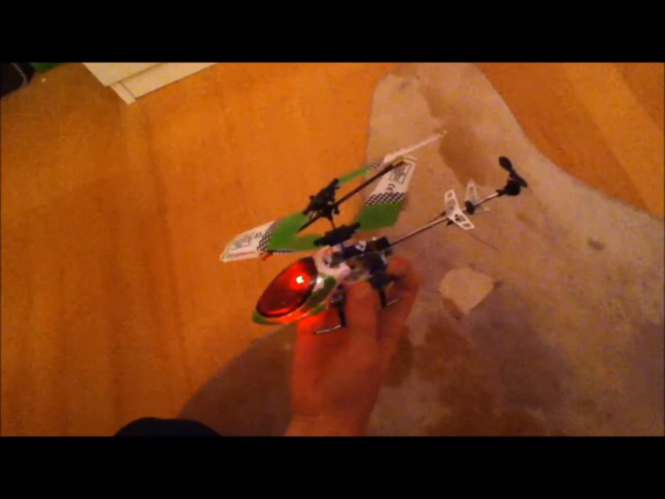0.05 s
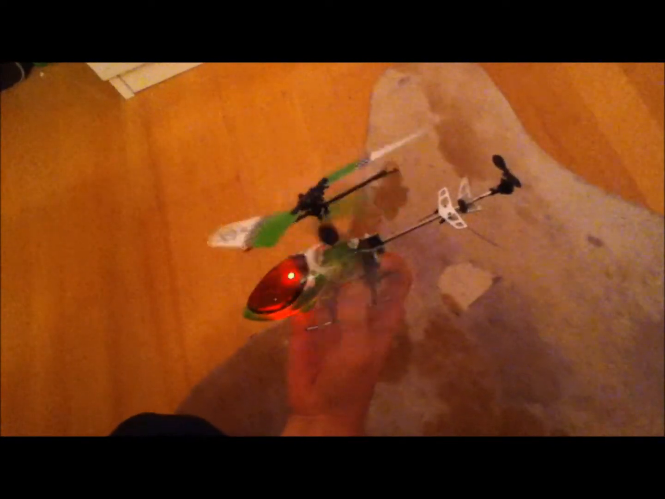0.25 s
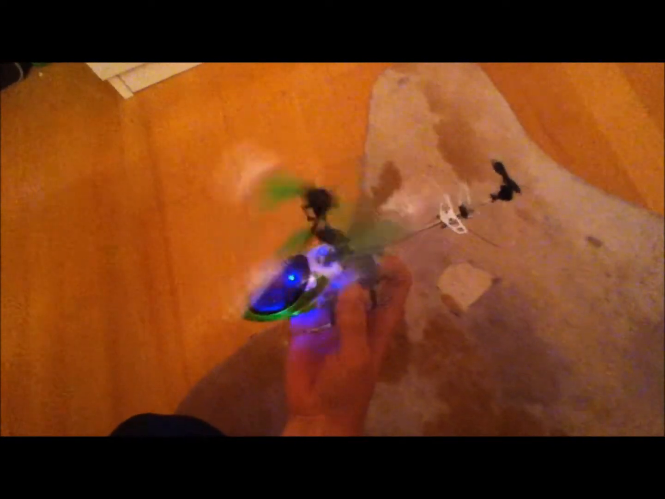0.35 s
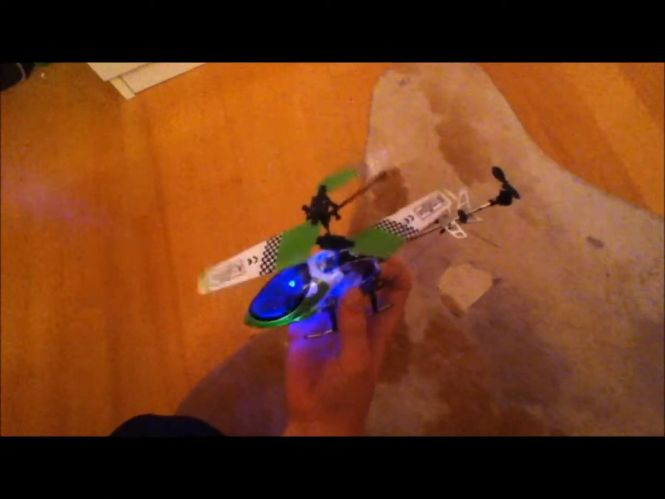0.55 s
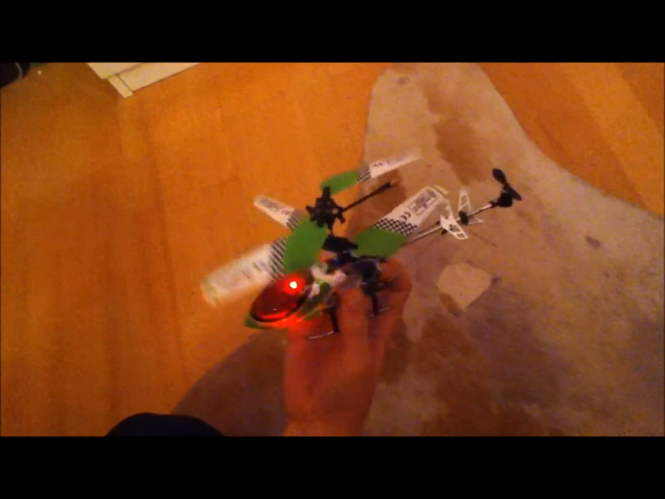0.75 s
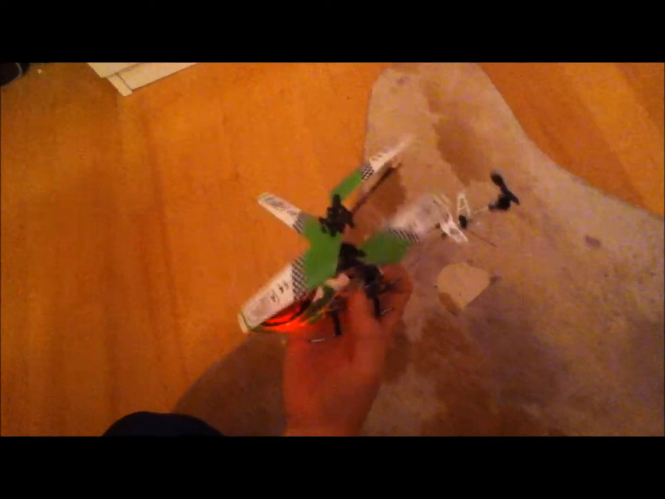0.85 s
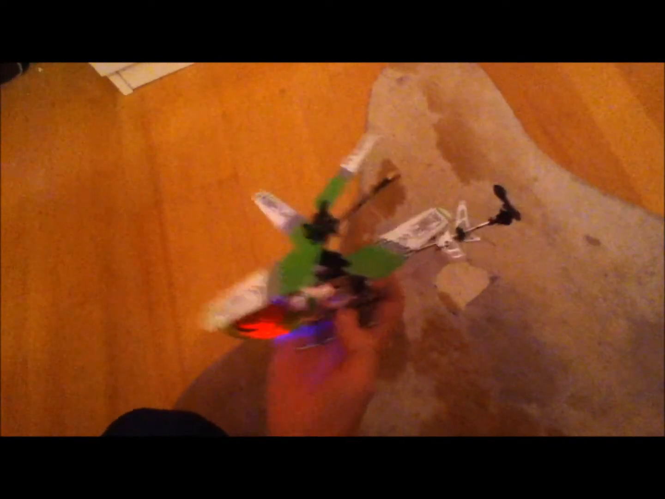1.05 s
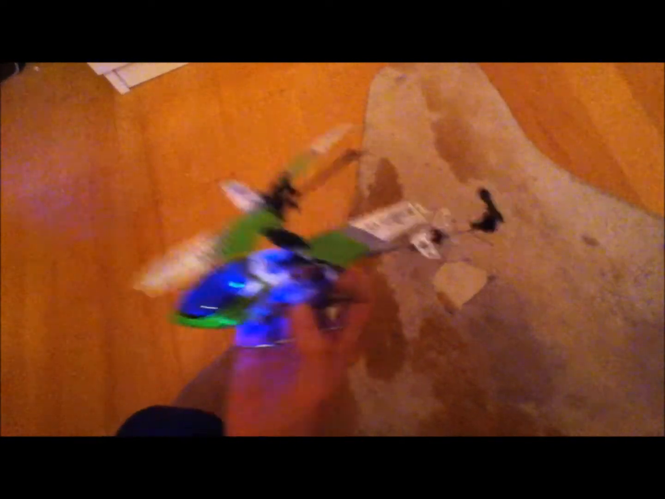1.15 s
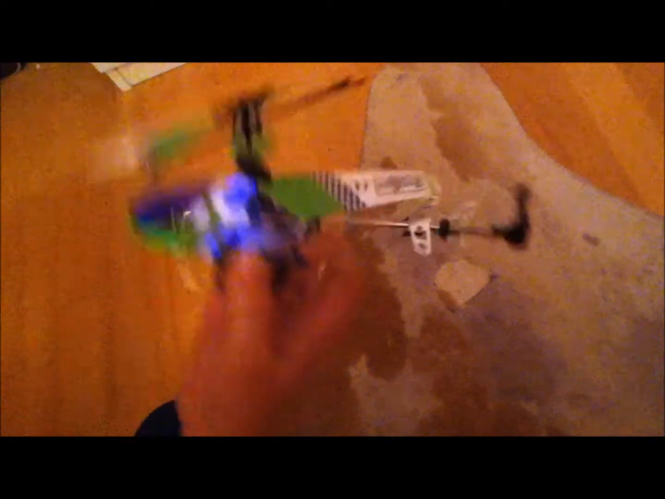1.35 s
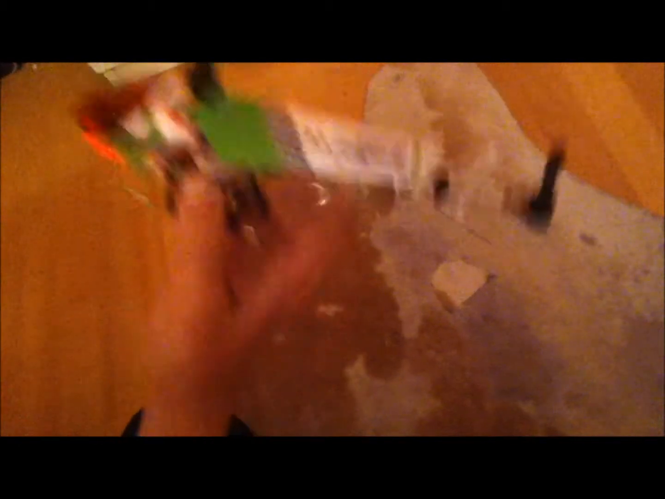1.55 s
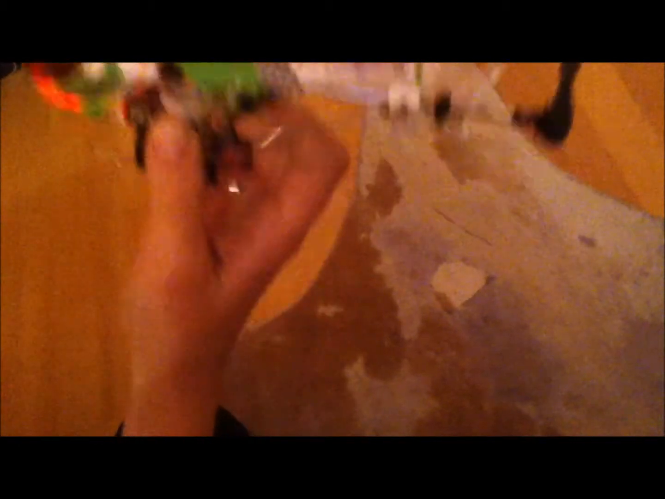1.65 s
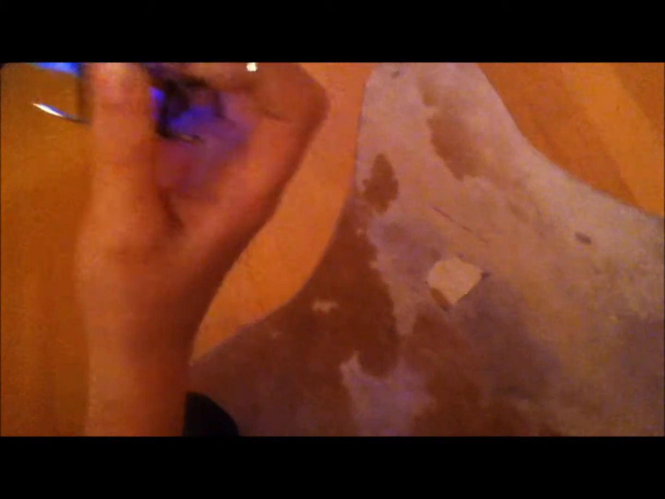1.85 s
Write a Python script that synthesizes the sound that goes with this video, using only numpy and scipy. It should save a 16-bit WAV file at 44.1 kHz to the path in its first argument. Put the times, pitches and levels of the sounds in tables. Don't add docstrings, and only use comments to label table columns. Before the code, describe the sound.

Toy helicopter spins up in the hand, its plastic gears whining and clattering before running down

```python
import sys
import numpy as np
from scipy import signal
from scipy.fft import rfft, irfft, next_fast_len
from scipy.io import wavfile
from scipy.ndimage import uniform_filter1d, map_coordinates

SR = 44100
rng = np.random.default_rng(int(sys.argv[2]) if len(sys.argv) > 2 else 0)


def boost(x):
    u = np.asarray(x, float) / 20
    return 10 ** u


def generate_wav(signal):
    frames = np.transpose(np.atleast_2d(signal))
    scaled = np.clip(frames, -1, 1) * 32767
    pcm = np.round(scaled).astype(np.int16)
    wavfile.write(sys.argv[1], SR, pcm)


N = 83790

# f/Hz, level/dB per Hz
AIR_COLOUR = [(20, -28), (50, -14), (110, -5), (400, -11), (600, -13.5), (1200, -17), (2200, -24),
              (8000, -23.5), (16000, -32.5)]
# f/Hz, level/dB
HUM_LINES = [(457.6, -61)]
# f/Hz, t60/s
ROOM_DECAY = [(500, .35), (1800, 0.35), (5000, 0.13), (14000, 0.42)]
# start t/s, top t/s, end t/s
RUB_TIMES = (1.39, 1.42, 1.465)
# f/Hz, level/dB per Hz
SKIN_COLOUR = [(590, -65), (1000, -26), (1780, -7), (2740, -16), (3520, -13), (4670, -21), (10600, -16),
               (15000, -44)]
# t/s, length/s, level/dB, ring f/Hz, hiss level/dB
HAND_KNOCKS = [
    (1.474, .003, -38, 1800, -8),
    (1.479, .015, -29, 1810, -3),
    (1.81, .009, -42, 1750, 1),
]
# f/Hz, level/dB
KNOCK_COLOUR = [(400, -44.5), (800, -7), (1300, 1), (2000, 1), (3600, -4.5), (7500, -7.5), (11000, -12),
                (16000, -29)]
# t/s, length/s, level/dB, ring f/Hz, hiss level/dB
SHELL_TICKS = [(.254, .006, -16, 1990, -18),
                                                                                                            (.278, .02, -12, 2010, -18),
                                                                                                            (.31, .005, -9, 1990, -18),
                                                                                                            (.326, .011, -11, 1950, -15),
                                                                                                            (.62, .028, -22, 2030, -25),
                                                                                                            (.703, .012, -23, 2000, -25),
                                                                                                            (.492, .008, -10, 4200, -2),
                                                                                                            (1.252, .018, -40, 1900, -12)]
# f/Hz, level/dB
SHELL_COLOUR = [(500, -48.5), (1100, -22.5), (1500, -7.5), (2500, -9.5), (3000, -14.5), (7000, -8),
                (11500, -13), (16000, -22)]
# f/Hz, width/Hz, level/dB
SHELL_RINGS = [(1609, 79, -2), (2011, 74, 7.5), (2156, 504, 4.5), (3115, 120, 8.5), (3970, 270, 5),
               (4840, 200, 2), (7020, 280, 2.5), (8970, 130, -13.5), (11190, 390, 2.5)]
# t/s, tooth rate f/Hz, whine level/dB, rattle level/dB
MOTOR_RUN = [(.2255, 423, -110, -61), (.2315, 444.8, -77, -12.5), (.285, 570.3, -62, -11),
             (.34, 626.7, -62, -15), (.352, 653, -41, -23), (.42, 745, -38.5, -14.5),
             (.47, 781, -37.5, -17.5), (.57, 807, -33, -23), (.75, 814.9, -27.5, -20.5),
             (.86, 812, -26.5, -24), (.968, 800.8, -26.5, -27), (1.03, 637, -29.5, -27),
             (1.048, 582, -43, -28), (1.11, 475, -36.5, -35), (1.2, 336.5, -48.5, -38),
             (1.27, 258, -58, -39.5), (1.29, 225.4, -76, -41), (1.42, 150, -110, -56.5)]
# t/s, lead/teeth
GEAR_LEAD = [(.226, -5), (.612, .5), (.827, 3.5), (.9, 4), (.94, 4.5), (.99, 5.5), (1.4, 10)]
# level/dB, faster over slower gear/dB, once-a-turn swell start/turns
WHINE_LINES = [(13.5, -3, 0.099), (1.5, -4, 0.35), (-1.5, -2.5, 0.46), (-5, -5.5, .1), (-8, -1, .6),
               (-9.5, -6, .3), (-8.5, -4, .8), (-18, 1.5, 0.21), (-17, 0, .2), (-17, 4.5, .7)]
# from t/s, to t/s
HUSH_TIMES = [
    (.21, .228),
    (1.466, 1.473),
]

AIR_DB, ROOM_DB, RUB_DB = -54.5, -10.5, -41
TICK_RISE, TICK_FADE_S, TICK_GRIT_DB = .35, .006, 2.5
TICK_WIDTH, KNOCK_WIDTH = .11, .2
HIGH_FALL_DB, TEETH = 0.7, 57
SWELL, UNSTEADY_DB, JITTER_TEETH = .45, 3, .04
COAST_S, SLACK, COAST_DB = 1, 2.9, 6.5
HAND_DB = 11
GATED, LUMPY_DB, FAST_LUMPY_DB = 0.2, 1.5, 1
PATCHY_DB = 3
BRIGHTEN, SPLIT_HZ = .55, 2800
TOP_HZ = 16100
HUSH_HZ = 1400
SPARSE_HZ, SPARSE_DB = 12600, -10


def unit(x):
    return x / np.sqrt(np.mean(x ** 2) + 1e-20)


def along(points, hz):
    f, v = np.transpose(points)
    return np.interp(np.log(hz + 1), np.log(f + 1), v)


def curves(rows):
    s, *columns = np.transpose(rows)
    return [np.interp(np.arange(N) / SR, s, column) for column in columns]


def wobble(rate):
    at = np.arange(0, N + 64, 32)
    knots = rng.standard_normal(999)
    return np.interp(np.arange(N), at, map_coordinates(knots, [at * rate / SR]))


def filtered(x, response):
    m = next_fast_len(N + 8192, real=True)
    return irfft(rfft(x, m) * response(np.fft.rfftfreq(m, 1 / SR)), m)[..., :N]


def ring(f, hz, width_hz):
    return 1j * f * width_hz / (hz * hz - f * f + 1j * f * width_hz)


def patchy(x, db):
    z = signal.stft(x, nperseg=512)[2]
    field = uniform_filter1d(rng.standard_normal(z.shape), size=7, axis=0)
    field = uniform_filter1d(field, size=6, axis=1)
    return signal.istft(z * boost(db * unit(field)), nperseg=512)[1][:N]


def floor():
    air = unit(filtered(rng.standard_normal(N), lambda f: boost(along(AIR_COLOUR, f))))
    t = np.arange(N) / SR
    hum = np.zeros(N)
    for hz, db in HUM_LINES:
        level = boost(db + 3 + 1.5 * wobble(24))
        hum += level * np.sin(2 * np.pi * (hz * t + .12 * wobble(4.3)))
    return boost(AIR_DB + .8 * wobble(4.4)) * air + hum


def room(x):
    hz, t, z = signal.stft(rng.standard_normal(SR // 2), SR, nperseg=256)
    decay = boost(-60 * t / along(ROOM_DECAY, hz)[:, None])
    tail = signal.istft(z * decay, SR, nperseg=256)[1]
    delayed = np.pad(x, (200, 0))
    return signal.fftconvolve(delayed, tail / np.linalg.norm(tail))[:N]


def rub():
    start, top, end = RUB_TIMES
    stroke, = curves([(start, 0), (start + .008, .6), (top, 1), (end - .02, .6), (end, 0)])
    grit = rng.standard_normal(N) * boost(2.58 * wobble(200))
    return boost(RUB_DB) * stroke * unit(filtered(grit, lambda f: boost(along(SKIN_COLOUR, f)) * (f > 900)))


def ticks(rows, width, colour):
    out, t = np.zeros(N), np.arange(N) / SR
    for s, length, db, hz, hiss_db in rows:
        rise = np.clip((t - s) / (TICK_RISE * length), 0, 1)
        burst = rise * np.exp(-np.clip(t - s - length, 0, 1) / TICK_FADE_S)
        noise = rng.standard_normal(N)
        tone = unit(filtered(noise, lambda f: ring(f, hz, width * hz) ** 2))
        grit = noise * boost(TICK_GRIT_DB * wobble(300))
        edge = unit(filtered(grit, lambda f: boost(along(colour, f))))
        out += boost(db) * burst * (tone + boost(hiss_db) * edge)
    return out


def shell(f):
    rings = sum(boost(db) * ring(f, hz, width) for hz, width, db in SHELL_RINGS)
    return boost(along(SHELL_COLOUR, f)) * (1 + rings)


def whine(tooth_hz, teeth, coast):
    lead = uniform_filter1d(curves(GEAR_LEAD)[0], size=900)
    play = JITTER_TEETH * (1 + SLACK * coast)
    slow_drift, fast_drift = play * wobble(45), play * wobble(45)
    held_db = HAND_DB * coast * np.log2(tooth_hz.max() / tooth_hz)
    high = [(WHINE_LINES[-1][0] - HIGH_FALL_DB * k, -4, rng.random()) for k in range(1, 11)]
    out = np.zeros(N)
    for k, (db, fast_db, start) in enumerate(list(WHINE_LINES) + high, start=1):
        phase = rng.random()
        chance = 1 - 1 / (k + .5)
        swell = 1 + chance * SWELL * np.cos(2 * np.pi * (teeth / TEETH - start))
        pair = np.zeros(N)
        for gear, drift, over_db in [(teeth, slow_drift, 0), (teeth + lead, fast_drift, fast_db)]:
            level = boost(over_db + chance * UNSTEADY_DB * wobble(30.04))
            pair += level * np.sin(2 * np.pi * (k * (gear + chance * drift) + phase))
        gain_db = held_db if k == 1 else COAST_DB * coast * (k > 2)
        out += boost(db + gain_db) * swell * pair * (k * tooth_hz < TOP_HZ)
    return out


def rattle(teeth):
    gate = 1 - GATED + GATED * (1 + np.cos(2 * np.pi * teeth)) ** 2
    lumps = boost(LUMPY_DB * wobble(35) + FAST_LUMPY_DB * wobble(160))
    return unit(gate * lumps * patchy(rng.standard_normal(N), PATCHY_DB))


def gears():
    tooth_hz, whine_db, rattle_db = curves(MOTOR_RUN)
    teeth = np.cumsum(uniform_filter1d(tooth_hz, size=600)) / SR
    coast = np.clip((np.arange(N) / SR - COAST_S) / 0.011, 0, 1)
    both = boost(whine_db) * whine(tooth_hz, teeth, coast) + boost(rattle_db) * rattle(teeth)
    treble = filtered(both, lambda f: 1 / (1 + (SPLIT_HZ / (f + 1)) ** 6))
    both = both + (boost(BRIGHTEN * np.minimum(rattle_db + 22, 0)) - 1) * treble
    loss = np.sqrt(np.mean(abs(shell(np.arange(0., SR / 2, 10))) ** 2))
    return filtered(both, shell) / loss


def scene():
    shell_ticks = ticks(SHELL_TICKS, TICK_WIDTH, SHELL_COLOUR)
    hand_knocks = ticks(HAND_KNOCKS, KNOCK_WIDTH, KNOCK_COLOUR)
    toy = gears() + shell_ticks + hand_knocks + rub()
    return np.tile(toy + boost(ROOM_DB) * room(toy) + floor(), (2, 1))


def band_limit(x):
    return signal.sosfilt(signal.butter(12, 16180, fs=SR, output="sos"), x)


def record(dry):
    t = np.arange(N) / SR
    hush = uniform_filter1d(sum(1. * (t > a) * (t < b) for a, b in HUSH_TIMES), size=60)
    x = dry - filtered(hush * dry, lambda f: 1 / (1 + (HUSH_HZ / (f + 1)) ** 12))
    hz, _, z = signal.stft(np.clip(x, -1, 1), SR, nperseg=1024)
    treble = z[:, (hz > 5000) & (hz < SPARSE_HZ)]
    treble_rms = np.sqrt(np.mean(abs(treble) ** 2, axis=1, keepdims=True))
    weak = (abs(z) < boost(SPARSE_DB) * treble_rms) & (hz[:, None] > SPARSE_HZ)
    thinned = np.where(weak, .05 * z, z) * (hz[:, None] < TOP_HZ)
    x = signal.istft(thinned, SR, nperseg=1024)[1][:, :N]
    return band_limit(x)


dry = scene()
out = record(dry)
generate_wav(out)
```